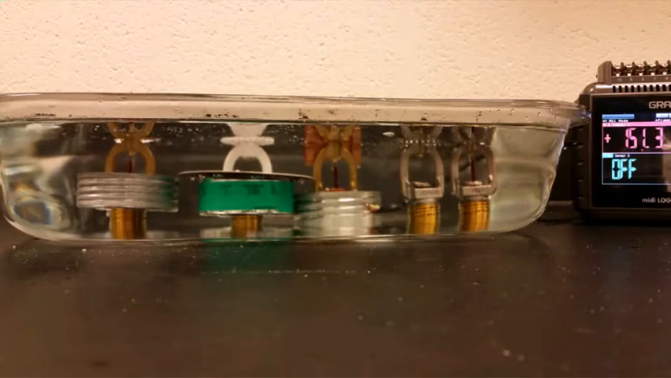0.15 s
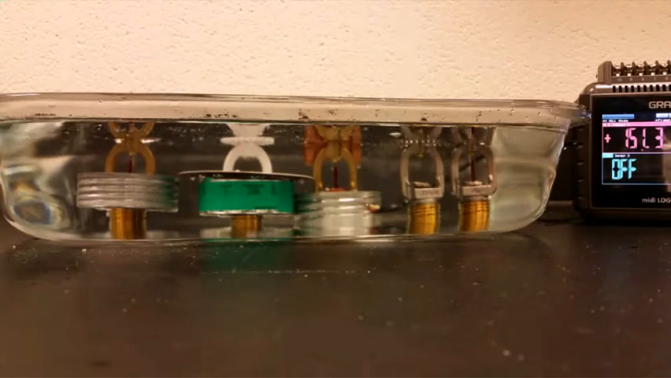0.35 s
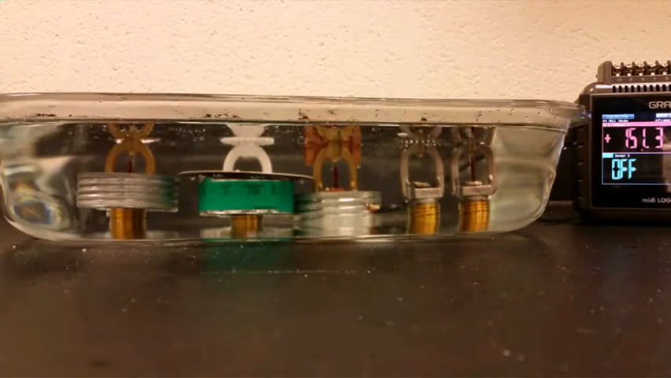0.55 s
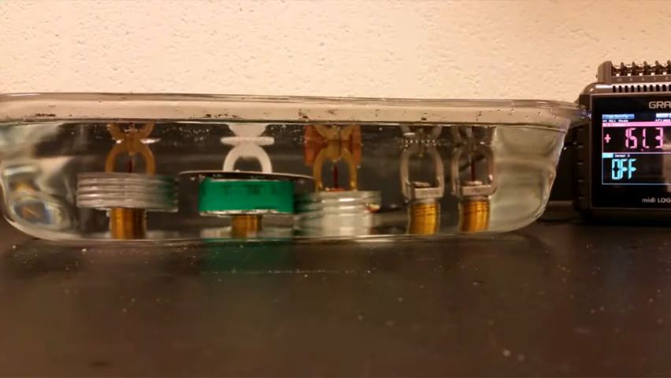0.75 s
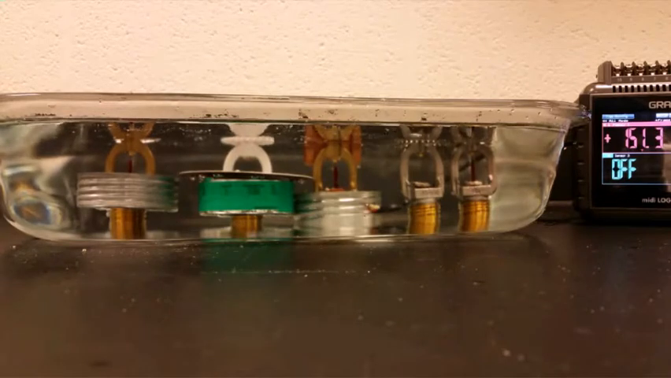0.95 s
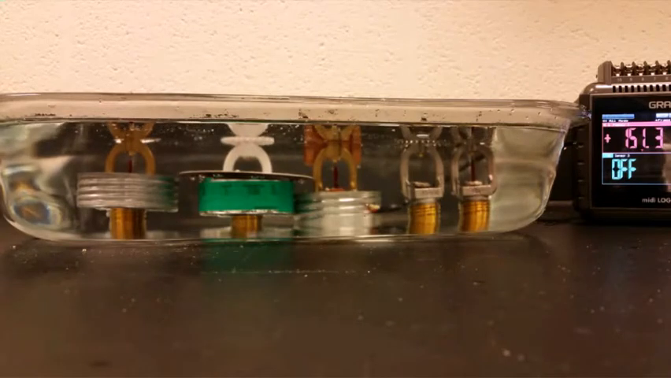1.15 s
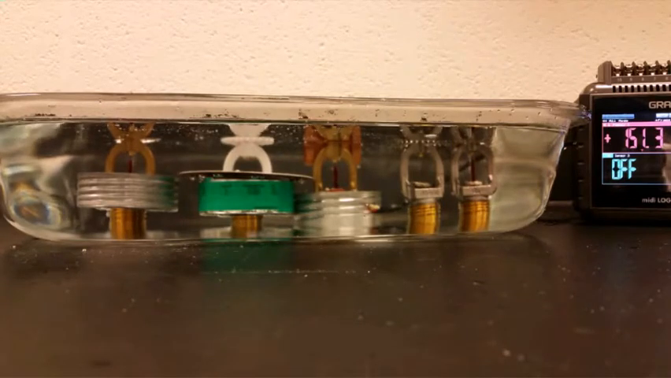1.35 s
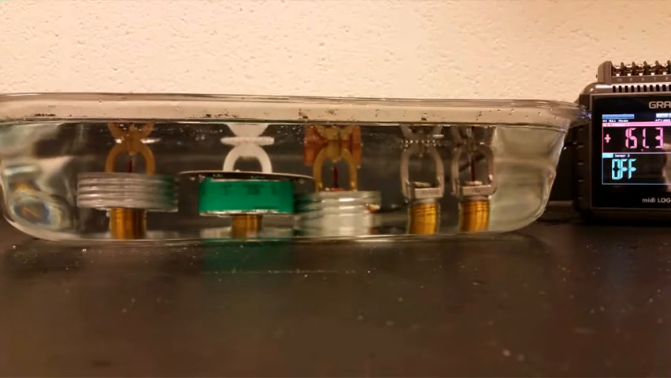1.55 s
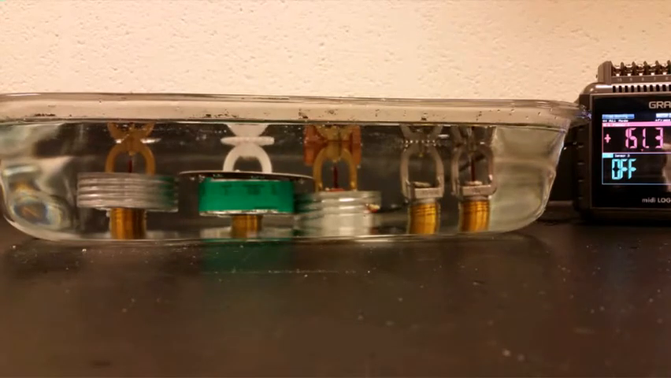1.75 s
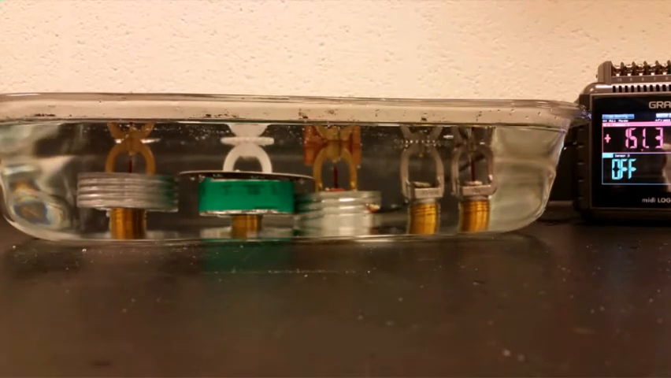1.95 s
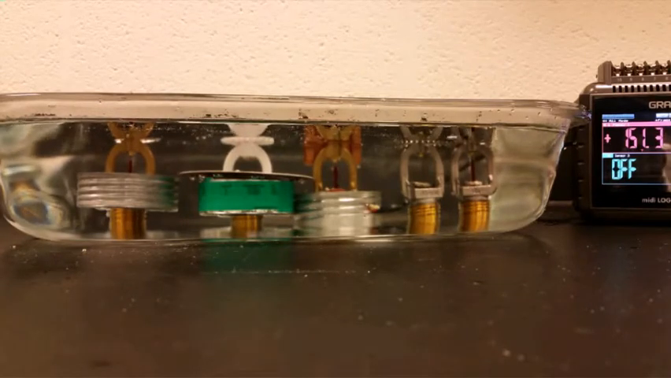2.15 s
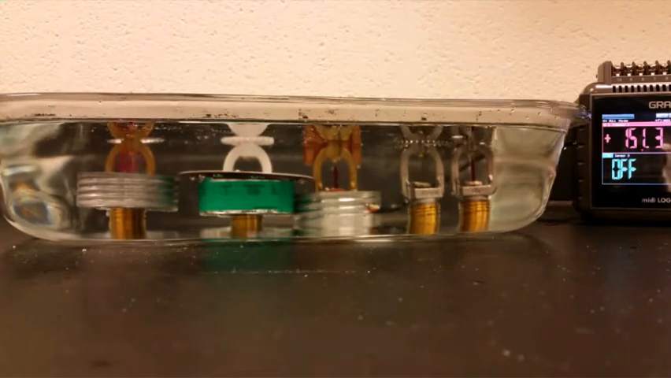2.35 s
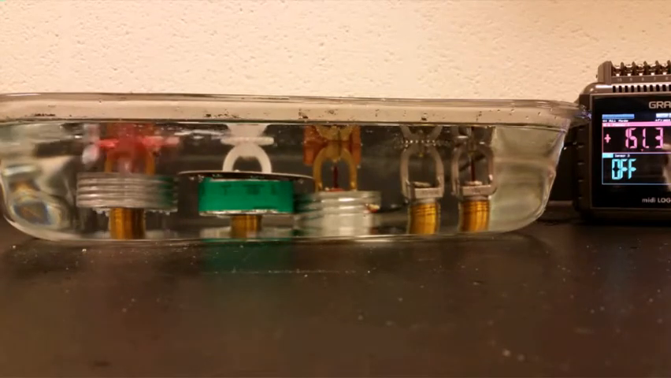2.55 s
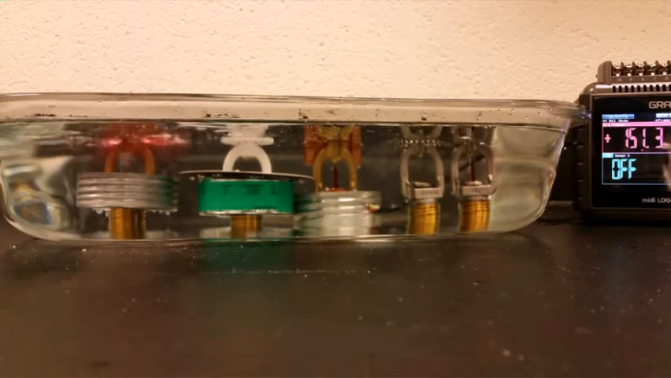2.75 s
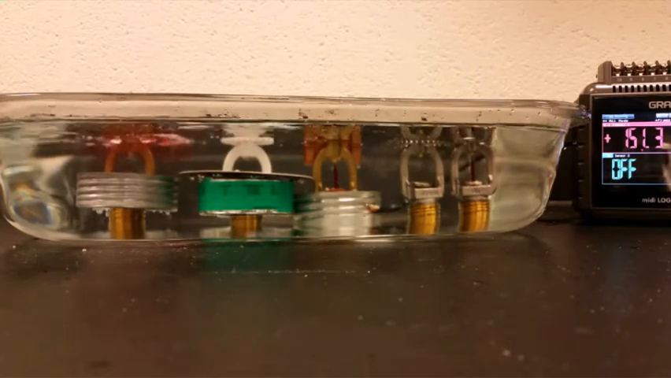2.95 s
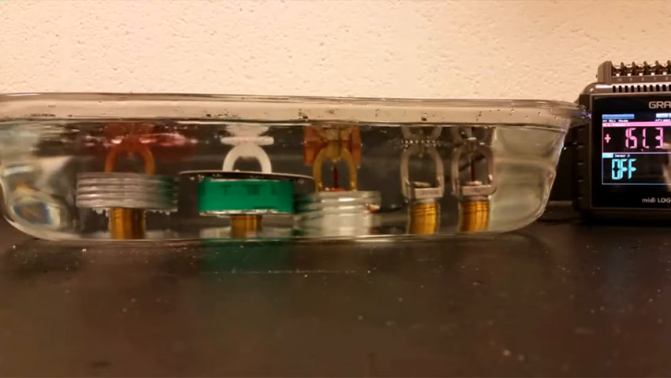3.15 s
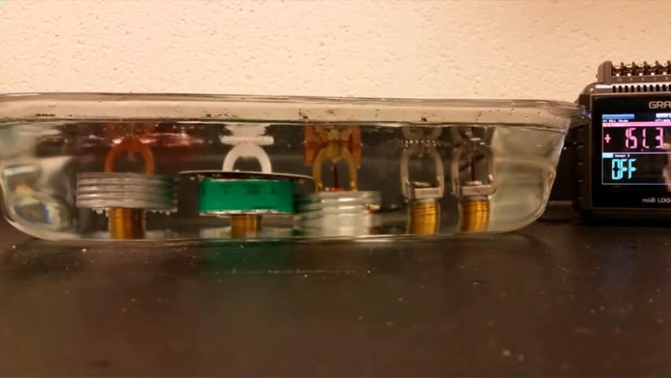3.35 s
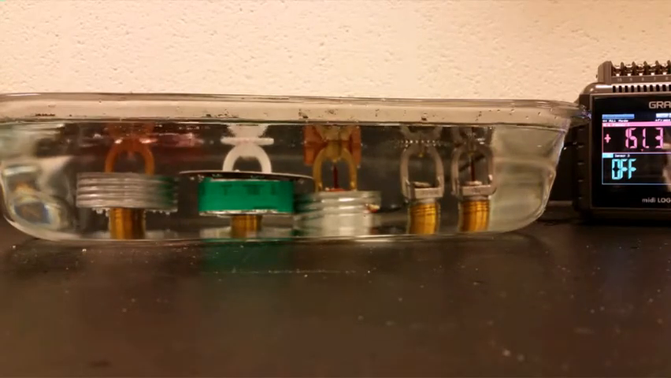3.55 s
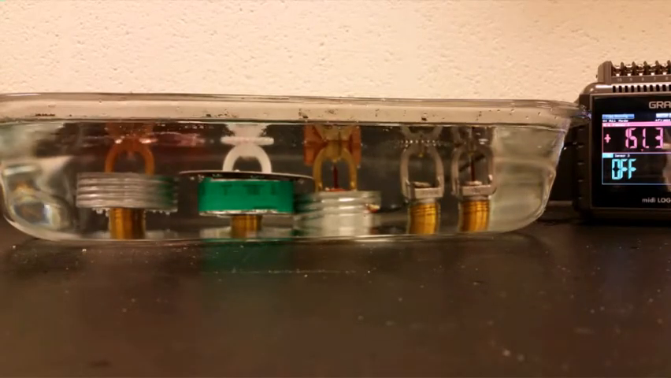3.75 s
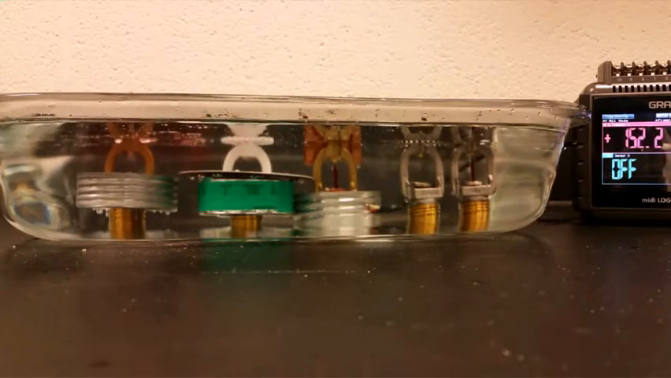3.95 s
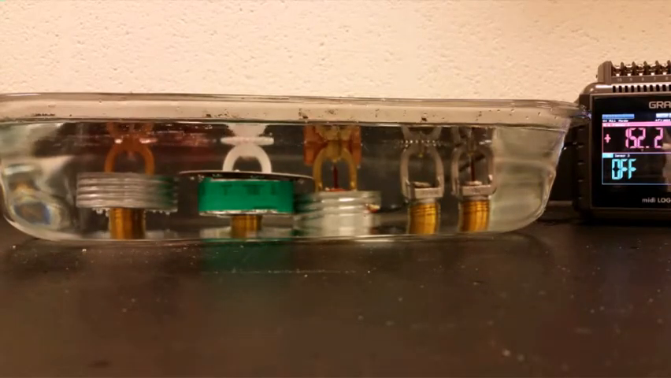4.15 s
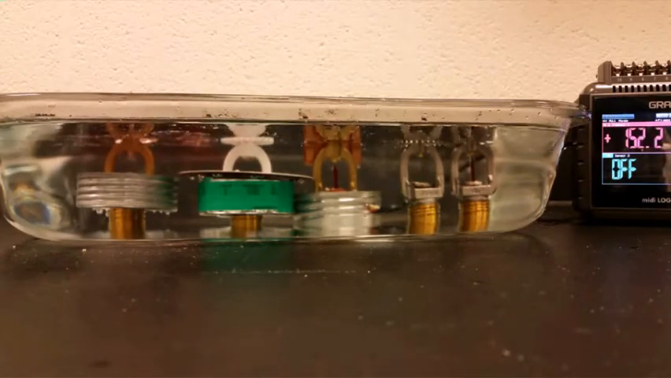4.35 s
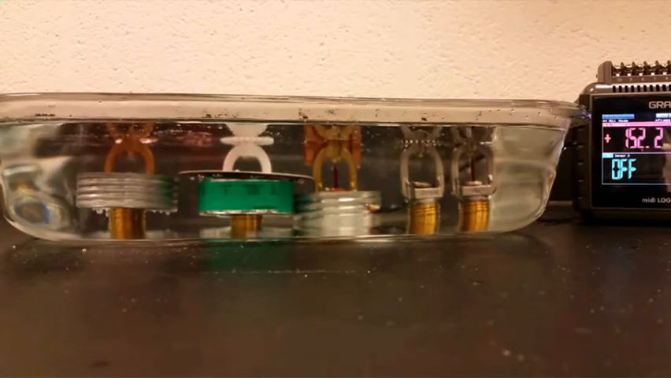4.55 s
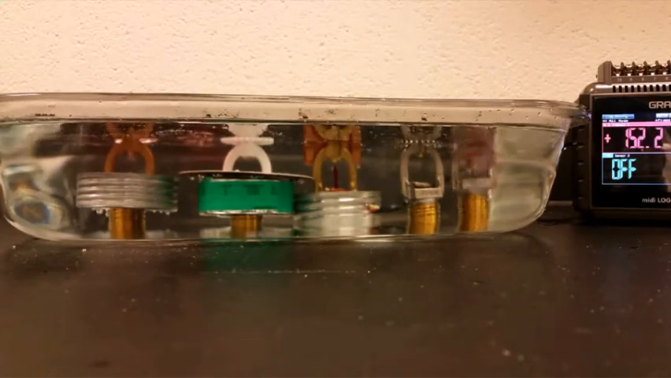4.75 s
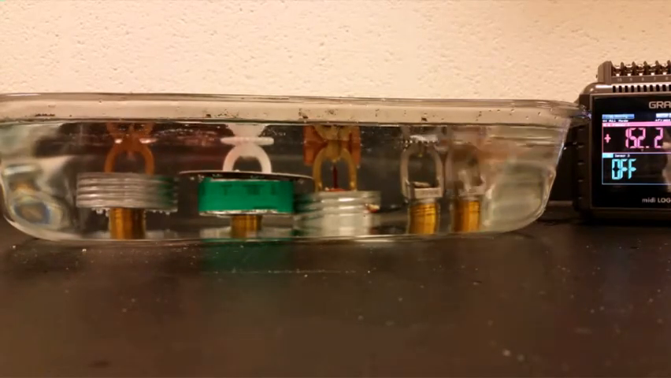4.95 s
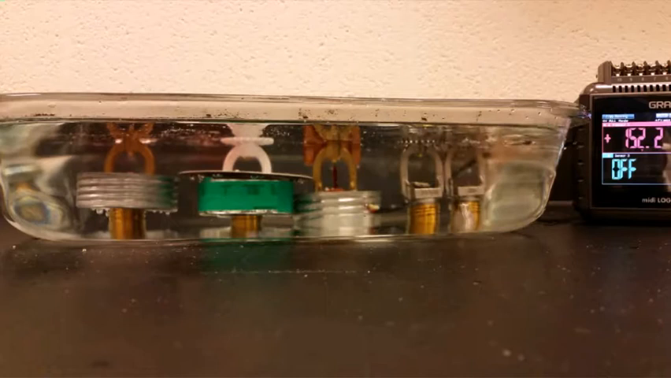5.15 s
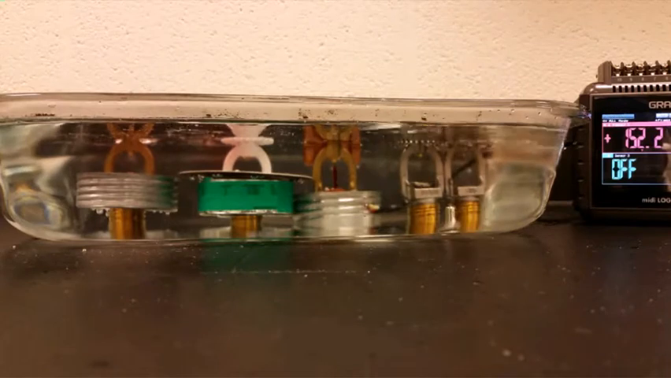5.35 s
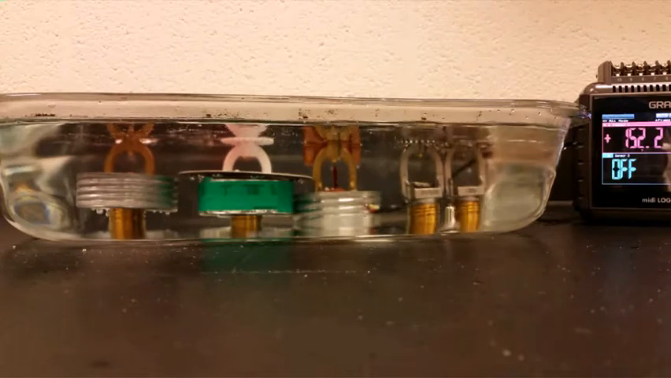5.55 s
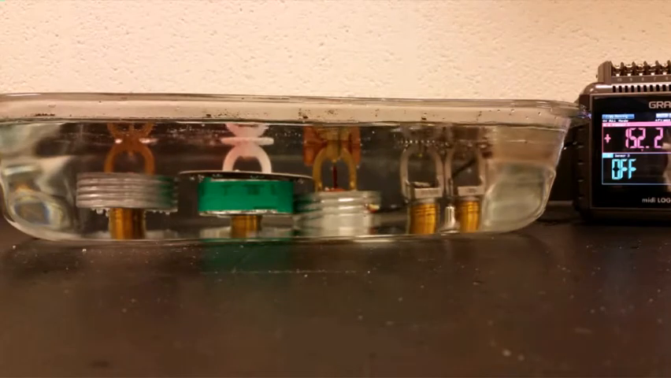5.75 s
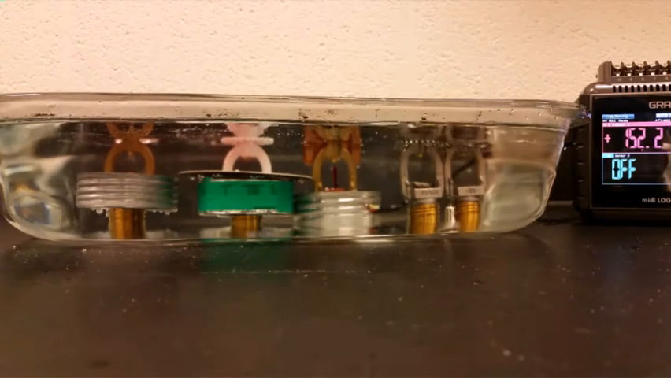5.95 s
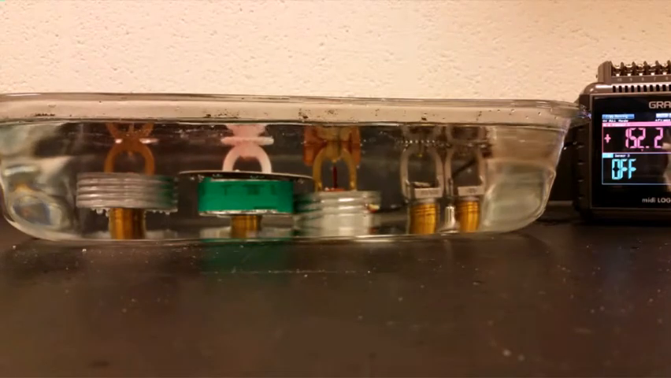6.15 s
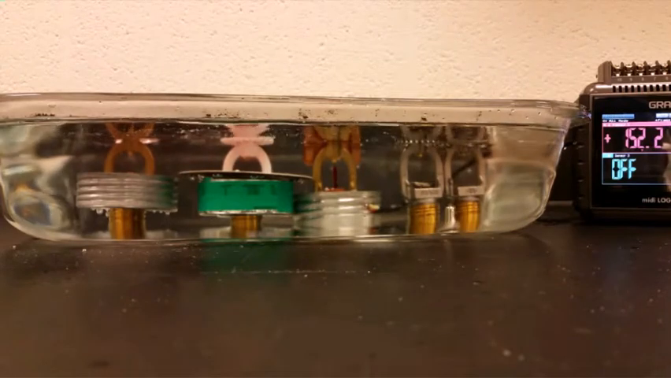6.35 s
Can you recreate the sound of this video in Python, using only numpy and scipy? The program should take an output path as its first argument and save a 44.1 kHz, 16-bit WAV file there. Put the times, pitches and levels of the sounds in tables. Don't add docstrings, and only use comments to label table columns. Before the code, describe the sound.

Over a low fan rumble and hum, a small glass bulb bursts sharply under water, then a second bursts, followed by clattering knocks and a fading rattle.

```python
import sys
import numpy as np
from scipy import signal
from scipy.fft import rfft, irfft, next_fast_len
from scipy.io import wavfile
from scipy.ndimage import uniform_filter1d

SR = 44100
rng = np.random.default_rng(int(sys.argv[2]) if len(sys.argv) > 2 else 0)


def file_out(sig):
    cols = np.atleast_2d(sig).T
    lim = np.clip(cols, -1, 1)
    pcm = np.round(lim * 32767).astype(np.int16)
    wavfile.write(sys.argv[1], SR, pcm)


def ratio(d):
    e = np.asarray(d, float) / 20
    return 10 ** e


N = 281358
SIZE = next_fast_len(N + SR)
HZ = np.arange(SIZE // 2 + 1) * SR / SIZE
TIME = np.arange(N) / SR


def on_hz(table, column=1, hz=HZ):
    table = np.array(table, float)
    return np.interp(np.log(hz + 1), np.log(table[:, 0]), table[:, column])


def through(x, response):
    return irfft(rfft(x, SIZE) * response, SIZE)[..., :N]


def causal(db):
    cepstrum = irfft(db * np.log(10) / 20, SIZE)
    cepstrum[1:SIZE // 2] *= 2
    cepstrum[SIZE // 2 + 1:] = 0
    return np.exp(rfft(cepstrum))


def mode(hz, t60):
    decay_s = t60 / np.log(1000)
    return 1 / (1 + 1j * np.pi * decay_s * (HZ - hz ** 2 / (HZ + 1)))


def walk(rate):
    k = int(SR / rate)
    steps = np.repeat(rng.standard_normal(N // k + 1), k)
    x = uniform_filter1d(uniform_filter1d(steps, k), k)[:N]
    return x / x.std()


def duck(start_s, fall_s, release_s, creep_s):
    sink = 1 - np.exp(-np.clip(TIME - start_s, 0, None) / fall_s)
    return sink * (1 - np.exp(-np.exp((release_s - TIME) / creep_s)))


# start of bass duck in seconds, bass fall in seconds,
# start of treble duck in seconds, release in seconds.
DUCKS = [
    (2.561, .09, 2.585, 3.59),
    (4.87, .21, 5.13, 5.997),
]


def gain_control():
    bass = sum(duck(s, fall, release, .17) for s, fall, _, release in DUCKS)
    treble = sum(duck(s, 0.29, release + 0.035, 0.19) for _, _, s, release in DUCKS)
    bass_db, treble_db = -18 * bass, -37.5 * treble
    return bass_db, treble_db - bass_db


# frequency in Hz, left level in dB per Hz, right level in dB per Hz.
FAN = [(20.06, -75.5, -64.5), (40, -61.5, -56.5), (105, -53.5, -56), (189, -59.5, -61), (363, -67, -72),
       (567, -74, -79), (1034, -79, -83.5), (2024, -85.5, -92), (4100, -88, -99.8), (4630, -92, -109.8),
       (6900, -92.5, -111.7), (7746, -109.5, -117.1), (8900, -119.3, -114.5), (15500, -111.5, -110.8)]
# frequency in Hz, left-right likeness from -1 to 1.
ALIKE = [(25, 0.98), (60, .93), (300, .85), (700, 0.87), (1100, -0.085), (1800, -0.33), (2600, -0.16)]
# frequency in Hz, width in Hz, left gain in dB, right gain in dB.
NOTCHES = [(7400, 130, -22, -0.5), (8330, 170, -12, -8.5)]
# frequency in Hz, left level in dB, right level in dB, wobble width in Hz.
HUM = [(121.45, -30, -35, 4), (173.8, -48, -55.5, 2.3), (294.6, -48, -50, 3.5), (355.3, -58, -56.5, 5.2),
       (600, -58.5, -72, 1.3), (6710, -69, -93, 3.2)]
# frequency in Hz, share of the further cut from 0 to 1.
TREBLE_SHARE = [(350, 0), (900, 0.43), (2200, 0.93), (5000, 0.91)]


def fan_spectrum():
    like = np.clip(on_hz(ALIKE), -1, 1)
    common, own = rfft(rng.standard_normal((2, SIZE)))
    right = like * common * np.exp(-.25j) + np.sqrt(1 - like ** 2) * own
    fan = np.array([common, right]) * np.sqrt(SR / 2)
    level_db = np.array([on_hz(FAN, side) for side in (1, 2)])
    fan = fan * ratio(level_db) * np.minimum(1, (HZ / 15) ** 2)
    notch_db = 0
    for hz, width, left_db, right_db in NOTCHES:
        notch_db = notch_db + np.array([[left_db], [right_db]]) * np.exp(-((HZ - hz) / width) ** 2)
    return fan * ratio(notch_db)


def room_tone():
    fan = fan_spectrum()
    gain_db, cut_db = gain_control()
    out = 0
    octaves = np.clip(np.log2(HZ / 40 + 1e-9), 0, 8)
    for k in range(9):
        band = irfft(fan * np.clip(1 - abs(octaves - k), 0, 1), SIZE)[:, :N]
        share = on_hz(TREBLE_SHARE, hz=40 * 2. ** k)
        out = out + band * ratio(gain_db + share * cut_db + .5 * walk(10))
    for hz, left_db, right_db, width in HUM:
        phase = 2 * np.pi * np.cumsum(hz + .15 * width * walk(2 * width)) / SR
        size = ratio(gain_db + on_hz(TREBLE_SHARE, hz=hz) * cut_db + 2.5 * walk(4.5 * width))
        sides = ratio(np.array([[left_db], [right_db]]))
        out = out + np.sqrt(2) * size * sides * np.sin(phase + np.array([[0], [.25]]))
    return out


# start in seconds, level in dB.
TICKS = [
    (.21, -61),
    (1.77, -60),
    (2.18, -65),
]


def ticks(hz=6750., width=620.0):
    size = sum(ratio(db) * (TIME > s) * np.exp(-np.clip(TIME - s, 0, None) / 0.011) for s, db in TICKS)
    ring = through(size * rng.standard_normal(N), ratio(21.0) * mode(hz, 3.2 / width))
    return ring * np.array([[1], [ratio(-33)]])


# frequency in Hz, t60 in seconds, then level in dB over the crack
DISH = [(753, 0.21, 16, 0.5, -1.5, -7), (908, 0.086, 6, 1.5, 8, -9), (1045, 0.21, -2, -3.5, 7.5, -7),
        (1252, .1, 5.5, -6.5, 2, -9), (1472, .06, 9, 16, 4.5, -11), (1843, 0.054, 7.5, 1, -16, 8),
        (2390, 0.012, 7, -6, -1.5, -20), (2770, 0.014, 4.5, 4.5, 8.5, 13.5),
        (3200, 0.028, -2.5, 10, 12, -5), (3624, 0.057, 22, 16.5, 16, 22), (4025, 0.093, 21, 4, -11, -12),
        (4160, .04, 5, 5.5, 3, -6), (4570, 0.031, -1.5, 13.5, 14, 12), (5220, 0.026, 4, 1.5, 10, -13),
        (5780, 0.038, 12.5, 10.5, 3.5, 11), (6470, 0.012, 7.5, 8, -9, 3), (7490, .03, 4.5, -1, -9.5, -5)]


def dish_ring(column):
    return sum(ratio(row[column]) * mode(row[0], row[1]) for row in DISH)


def cracks(blows, colour, dish, fall_ms, wash_db, wash_ms, wash_top_hz, lead_in_db, snap_db, rise_ms=.36):
    crack, wash, snap = np.zeros((3, N))
    for s, db, ms, *_ in blows:
        near = slice(int((s - .01) * SR), int((s + .6) * SR))
        age = (TIME[near] - s) * 1000
        lead_in = ratio(2 * lead_in_db) * (age > -4.0)
        rise = np.clip(age / rise_ms, 0, 1)
        fall = np.exp(-age / 20.0 - np.clip(age - ms, 0, None) / fall_ms)
        crack[near] += ratio(2 * db) * np.maximum(rise, lead_in) * fall
        wash[near] += ratio(2 * (db + wash_db)) * rise * np.exp(-age / wash_ms)
        snap[int(s * SR + rise_ms * SR / 1000)] = ratio(db + snap_db)
    common, left, right, spray_left, spray_right = rng.standard_normal((5, N))
    shared = 0.22
    noise = np.sqrt(shared) * np.array([common, -np.roll(common, 25)])
    noise = noise + np.sqrt(1 - shared) * np.array([left, right])
    splinter_size, droplet_size = ratio(1.5 * np.array([walk(900), walk(300)]))
    side_top = np.array([1 / (1 + (HZ / 9000) ** 6), 1 / (1 + (HZ / 14500) ** 8)])
    dull = side_top / (1 + 1j * HZ / wash_top_hz)
    low_cut = np.minimum(0, 60 * np.log10((HZ + 1) / 650))
    ears = np.array([causal(on_hz(colour, side) + low_cut) for side in (1, 2)])
    contact = np.array([snap, -np.roll(snap, 25)])
    splinters = through(noise * np.sqrt(crack) * splinter_size + contact, dish * ears)
    spray = np.array([spray_left, spray_right]) * np.sqrt(wash) * droplet_size
    return splinters + through(spray, ratio(6.5) * dull * ears)


# start in seconds, level in dB, crack length in ms, thud in dB over the
FIRST = [
    (2.4816, -4.5, 6.9, -2.5),
    (2.5300, -7.5, 2.8, -6),
    (2.547, -17, 7.5, -2),
    (2.560, -16.5, 6.6, 0.3),
    (2.576, -30, 9.8, -17.5),
    (2.6754, -42.5, 2.3, -4.5),
]
# frequency in Hz, left gain in dB, right gain in dB.
FIRST_COLOUR = [(400, -8.5, -17), (830, -4, -15), (1500, 0, -2), (2540, -4, -5), (3483, -3.5, -19),
                (4900, -7, -24), (6830, -0.5, -19), (7960, -17.5, -21), (9600, -26, -18),
                (12400, -29.5, -20.5), (15500, -41, -33.5)]


def first_burst():
    ring = dish_ring(2)
    burst = cracks(FIRST[:1], FIRST_COLOUR, 1 + ring, fall_ms=2.2, wash_db=-12.5, wash_ms=24,
                   wash_top_hz=5000, lead_in_db=-33, snap_db=8.5)
    wet_ring = ratio(np.where(HZ > 950, -11, 8)) * ring
    cap = cracks(FIRST[1:], FIRST_COLOUR, 1 + wet_ring, fall_ms=1.7, wash_db=-12, wash_ms=15.5,
                 wash_top_hz=5180, lead_in_db=-33.5, snap_db=13)
    return burst + cap


# start in seconds, level in dB, crack length in ms, thud in dB over the
SECOND = [
    (4.8633, -4.5, 4.5, 0.9),
    (4.899, -38.5, 3, 22.5),
    (4.9332, -4.5, 3, -5),
    (4.958, -27, 2.2, -9),
    (4.9657, -5.5, 1.9, -8.5),
    (4.9912, -9.5, 1.7, -8.5),
    (5.0047, -10, 1.4, -10),
    (5.023, -26, 5, -3),
    (5.0554, -34, 4.6, 5.5),
    (5.1645, -36, 0.86, -7.5),
]
# frequency in Hz, t60 in seconds, level in dB after the first burst,
# level in dB after the second, right minus left in dB, first swing up or down (signed).
TABLE = [(62.3, 0.62, -28.5, -24, -13, 0.86), (117.7, 0.084, -14, -9, -18, -0.44),
         (130, 0.3, -5, -13, -20.5, 0.64), (164.4, 0.14, -22.5, -6, -13.5, -0.61),
         (190, 0.038, 7.5, -13.5, -22, 0.79), (209, 0.1, -16.5, 2, -27.5, 0.94),
         (238.2, 0.69, -4, -7, -12, -0.85), (290, 0.13, -23.5, -26, 4, -1),
         (335, 0.084, -17, -10, -9.5, 0.46)]


def thuds(blows, order):
    push = np.zeros(N)
    pulse = np.hanning(int(.003 * SR))
    for s, db, _, thud_db in blows:
        start = int((s + .0048) * SR)
        push[start:start + len(pulse)] += ratio(db + thud_db) * pulse
    rings = 0
    for row in TABLE:
        hz, t60, right_db, swing = row[0], row[1], row[-2], row[-1]
        sides = ratio(row[order] + np.array([[0], [right_db]]))
        rings = rings + swing * sides * t60 * ratio(38.5) * mode(hz, t60)
    return through(push, rings * np.array([HZ > 0, np.sign(90 - HZ)]))


# frequency in Hz, left gain in dB, right gain in dB.
SECOND_COLOUR = [(395, -6, -12), (798.5, 1, -5), (1506, -7, -12.5), (2420, 4, -1), (3520, -1, -12.5),
                 (4930, -6, -22.5), (6520, 5, -23), (7800, -29.5, -21), (10100, -39, -33.5),
                 (12500, -26.5, -9.5), (15020, -36.5, -46.5)]
KNOCK_COLOUR = [(393, -0.5, -12.5), (800, -6.5, -12.5), (1500, -7, -10.5), (2450, -0.5, -9),
                (3640, -4.5, -20), (5050, -9.5, -26), (6660, -9, -32), (7820, -16, -18.5),
                (9700, -23.5, -20), (12740, -28.5, -27), (15620, -34, -37)]


def second_burst():
    burst = cracks(SECOND[:1], SECOND_COLOUR, 1 + dish_ring(3), fall_ms=2.1, wash_db=-5.5, wash_ms=8.45,
                   wash_top_hz=9080, lead_in_db=-28.5, snap_db=4.5, rise_ms=1.9)
    knocks = cracks(SECOND[1:], KNOCK_COLOUR, 1 + dish_ring(4), fall_ms=2.1, wash_db=-13.5, wash_ms=17.2,
                    wash_top_hz=4000, lead_in_db=-40.5, snap_db=10.5, rise_ms=0.69)
    return burst + knocks


# start in seconds, level in dB, crack length in ms.
RATTLE = [(5.1993, -29, 4), (5.2245, -30, 2.1), (5.2452, -35.5, 2.8), (5.263, -33.5, 2.5),
          (5.278, -35, 2.8), (5.2882, -38.5, 16), (5.298, -46, 2.9), (5.31, -44, 3), (5.320, -44, 5.2),
          (5.333, -51, 4.7), (5.345, -44.5, 5.4), (5.354, -54, 2.6), (5.3702, -42, 2.3),
          (5.381, -41.5, 9.1), (5.4026, -43, 7.5), (5.4515, -58.5, 2.6)]
# frequency in Hz, left gain in dB, right gain in dB.
RATTLE_COLOUR = [(400, 0, 11.5), (815, -15, -30.5), (1500, -12, -15), (2400, -9, -13), (3500, -4.5, -20),
                 (5040, 0, -19), (6800, 3.5, -30), (7900, -8, -14), (10000, -14, -6.5), (12500, -11, -11),
                 (15500, -37, -24)]


def cap_rattle():
    return cracks(RATTLE, RATTLE_COLOUR, 1 + ratio(-4.5) * dish_ring(5), fall_ms=1.8, wash_db=-16.5,
                  wash_ms=12.0, wash_top_hz=14100, lead_in_db=-45, snap_db=7)


def scene():
    table = thuds(FIRST, order=2) + thuds(SECOND, order=3)
    return room_tone() + ticks() + first_burst() + second_burst() + cap_rattle() + table


# time of the blow in seconds, dip in dB.
DIPS = [
    (2.4809, 31),
    (4.8633, 17.5),
    (5.197, 18),
]


def limiter(x):
    dip_db = sum(dip * (TIME > s - .011) * (TIME < s - .004) for s, dip in DIPS)
    bass = through(x, 1 / (1 + (HZ / 700) ** 6))
    x = bass + (x - bass) * ratio(-uniform_filter1d(dip_db, 40))
    return x / (1 + (x / .87) ** 6) ** (1 / 6)


def band_limit(x):
    return signal.sosfilt(signal.butter(12, 16480, fs=SR, output="sos"), x)


def record(dry):
    x = limiter(dry)
    x = x + ratio(-91) * rng.standard_normal(x.shape)
    x = signal.sosfilt(signal.ellip(10, .3, 75, 15750, fs=SR, output="sos"), x)
    x = x * np.clip((TIME[-1] - TIME) / .004, 0, 1)
    return band_limit(x)


dry = scene()
out = record(dry)
file_out(out)
```